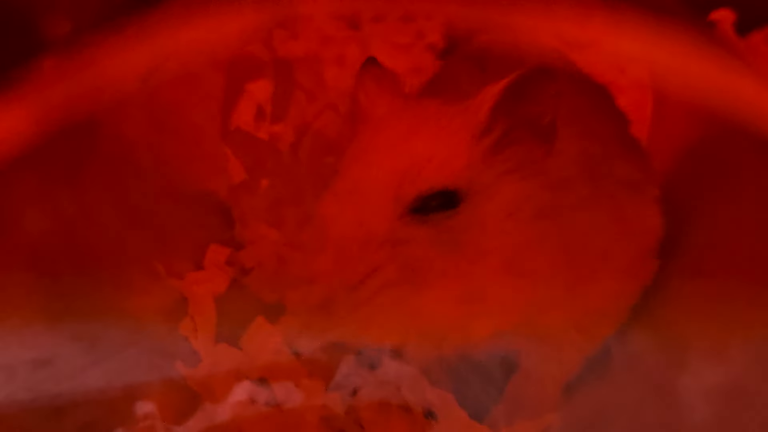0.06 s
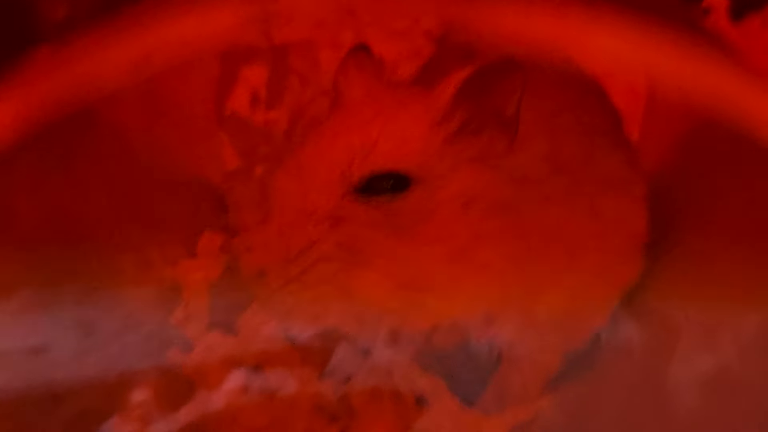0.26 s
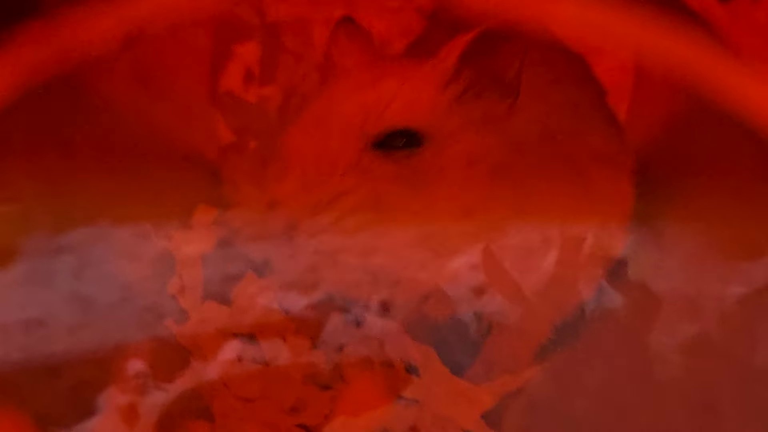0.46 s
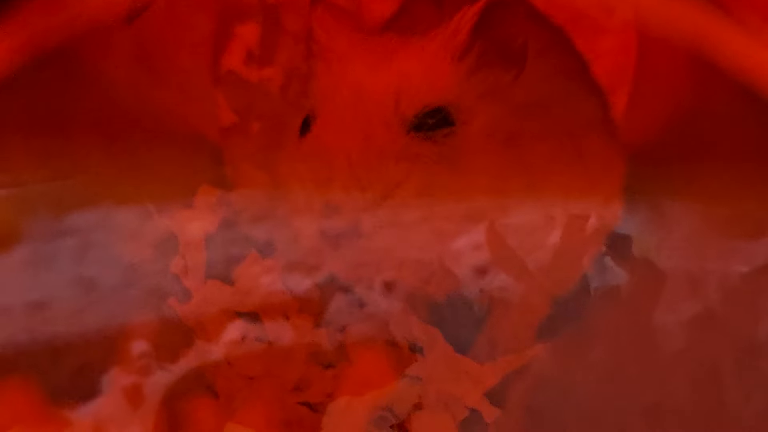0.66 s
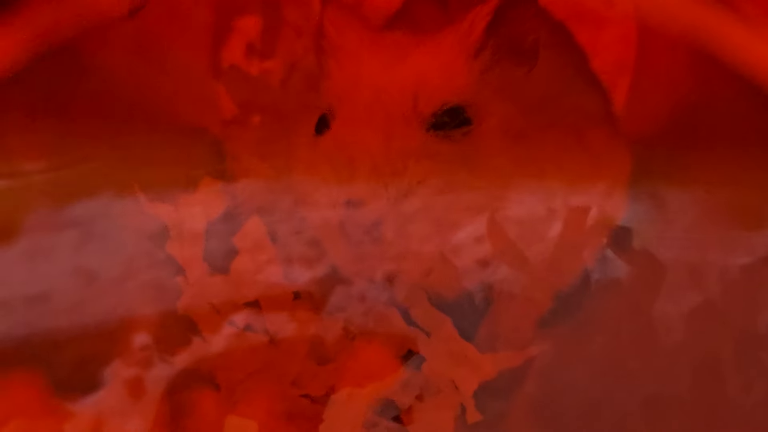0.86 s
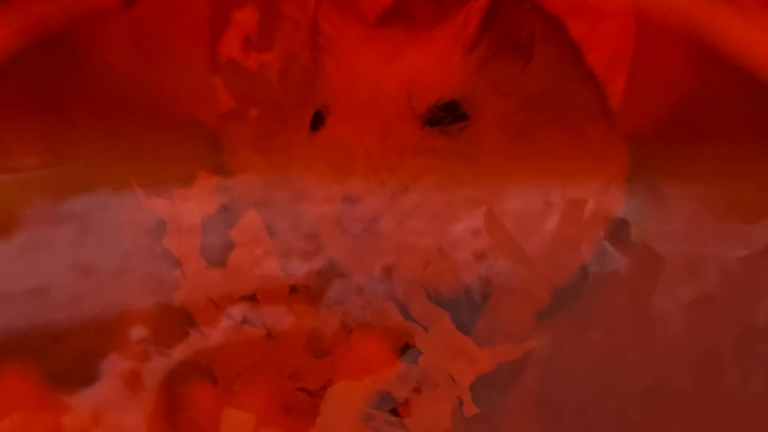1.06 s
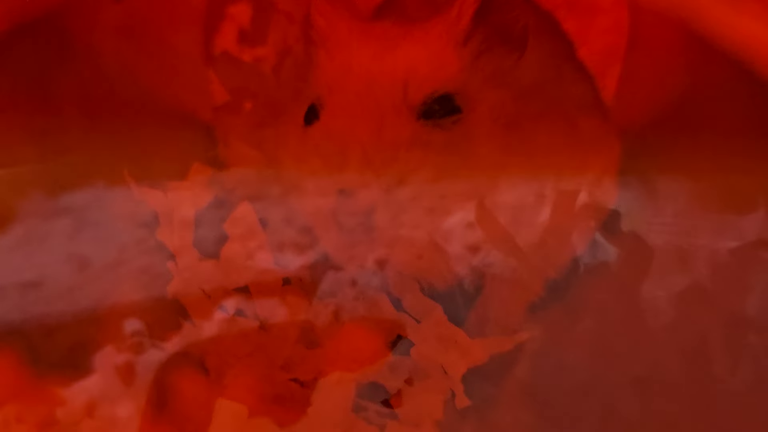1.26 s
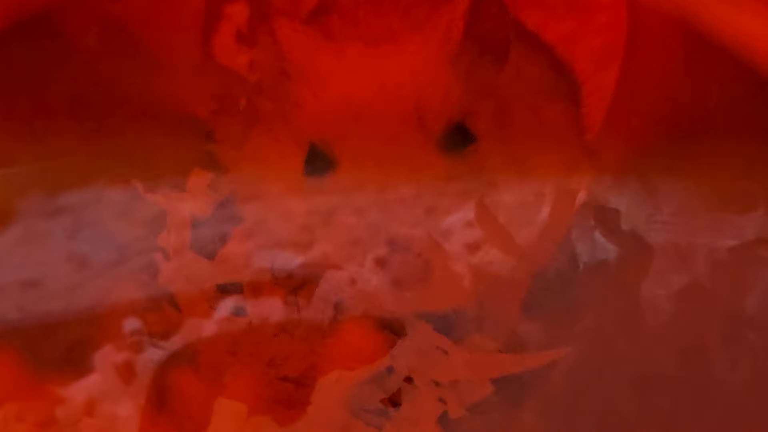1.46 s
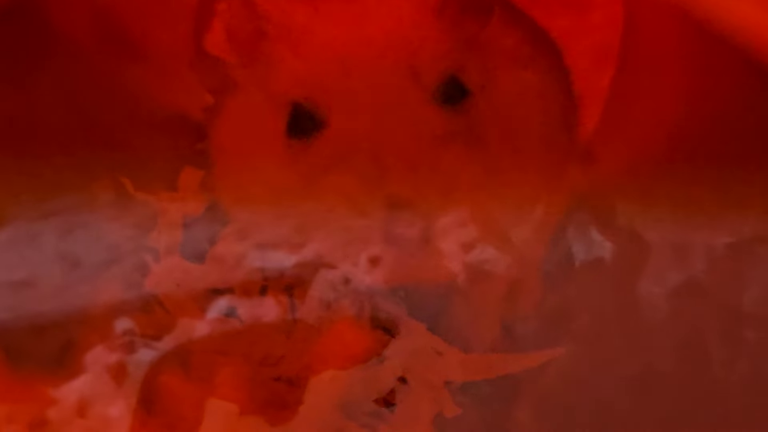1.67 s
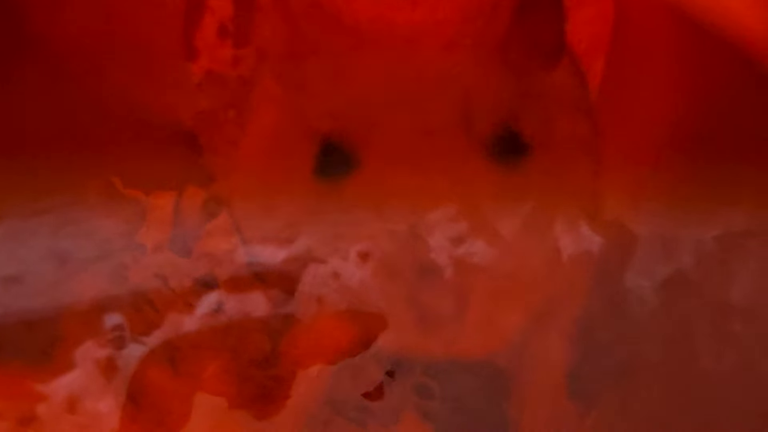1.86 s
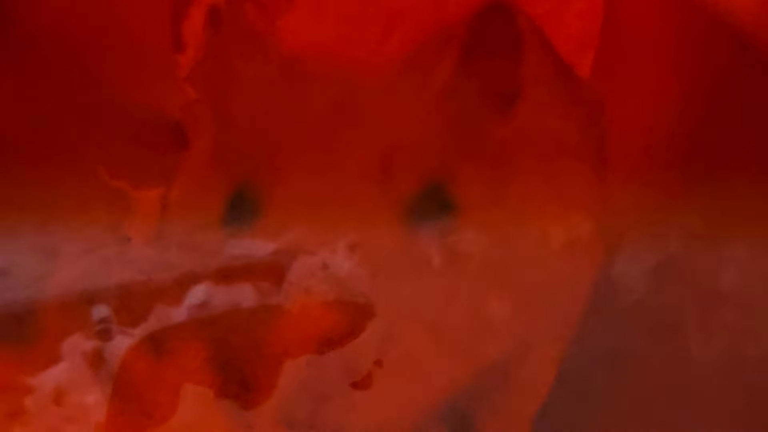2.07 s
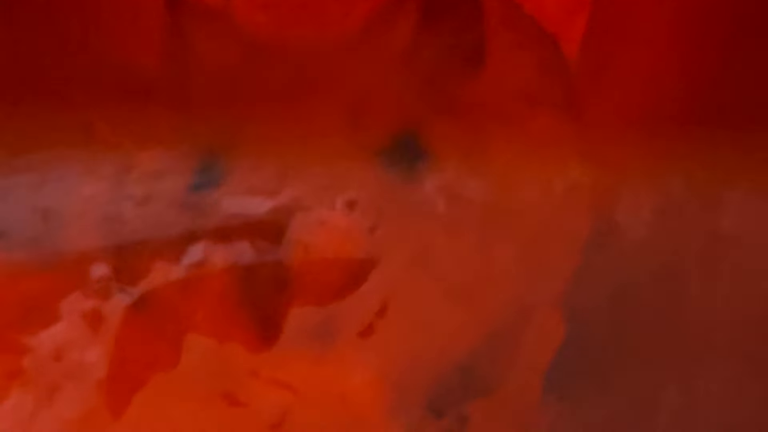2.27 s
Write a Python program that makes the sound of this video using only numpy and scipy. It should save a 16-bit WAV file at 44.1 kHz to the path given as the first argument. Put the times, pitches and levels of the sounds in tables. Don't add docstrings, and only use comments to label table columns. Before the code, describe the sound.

A small rodent rustles paper bedding and knocks a plastic hideout, with one hard early crack

```python
import sys
import numpy as np
from scipy import signal
from scipy.fft import rfft, irfft
from scipy.io import wavfile

SR = 44100
rng = np.random.default_rng(int(sys.argv[2]) if len(sys.argv) > 2 else 0)


def to_wav(s):
    ch = np.atleast_2d(s).T
    pcm = np.round(np.clip(ch, -1, 1) * 32767)
    wavfile.write(sys.argv[1], SR, pcm.astype(np.int16))


def voltage_ratio(decibels):
    exponent = np.asarray(decibels, float) / 20
    return 10 ** exponent


N = 101429

NEARER_PORT_DB = [[-9], [0]]


def rms_one(x):
    return x / np.sqrt(np.mean(x ** 2) + 1e-20)


def coloured(x, points):
    hz = np.fft.rfftfreq(N, 1 / SR) + 1
    at, db = np.transpose(points)
    gain = voltage_ratio(np.interp(np.log(hz), np.log(at), db))
    return rms_one(irfft(rfft(x) * gain, N))


def drift(rate_hz):
    r = np.exp(-2 * np.pi * rate_hz / SR)
    noise = rng.standard_normal(N + SR)
    return rms_one(signal.lfilter([1], [1, -2 * r, r * r], noise)[SR:])


def resonate(x, hz, width):
    r = np.exp(-np.pi * width / SR)
    poles = [1, -2 * r * np.cos(2 * np.pi * hz / SR), r * r]
    return signal.lfilter(np.array([1, 0, -1]) * (1 - r * r) / 2, poles, x)


def ports(x, left_db):
    lag_s = 0.0005
    late = np.interp(np.arange(N) - lag_s * SR, np.arange(N), x)
    return np.array([voltage_ratio(left_db) * late, x])


# pitch in Hz, width in Hz, level in dB.
SWAY_TONES = [(53.6, 19.8, -55), (91.5, 17, -71.5), (115, 81, -75.5), (523, 98.6, -75.5)]
SWAY_LEFT_DB = -4


def sway():
    out = 0
    for hz, width, db in SWAY_TONES:
        x = rng.standard_normal((2, N + SR // 2))
        for _ in range(2):
            x = resonate(x, hz, width)
        x = rms_one(x[:, SR // 2:]) * voltage_ratio(db)
        shared, own = x
        out = out + ports(shared, SWAY_LEFT_DB) + own * voltage_ratio(-18) * [[1], [-1]]
    return out


# pitch in Hz, level in dB per Hz.
HISS_COLOUR = [(15, -22.5), (30, -1.5), (150, 3.5), (400, -10.5), (1200, -17), (7500, -27.5), (8100, -47),
               (11500, -28), (15500, -29.5)]


def hiss():
    right_db, left_minus_right_db = -64, -6
    noise = coloured(rng.standard_normal((2, N)), HISS_COLOUR)
    return noise * voltage_ratio([[right_db + left_minus_right_db], [right_db]])


# start in seconds, length in seconds.
STROKE_TIMES = [(0, .024), (.054, .05), (.194, .05), (.305, .04), (.238, .008), (.704, .042), (1.408, .055),
                (1.503, .05), (1.615, .09), (1.43, .035), (1.9, .05), (1.908, .006), (1.99, .01),
                (2.078, .012), (2.113, .012), (2.165, .045), (2.25, .021), (2.18, .005), (2.193, .006),
                (1.805, .008), (1.775, .012), (2.285, .015), (0, .46), (1.33, 1), (.55, .14)]
# level in dB, dull part against the bright part in dB.
STROKE_LEVELS = [(-62, 0), (-64, -3), (-61, -5.5), (-68.5, -3.5), (-57.5, 10), (-68, -5.5), (-65, -3.5),
                 (-69, -13.5), (-73.5, -13), (-75, 4.5), (-73, 2.5), (-65.5, -1), (-72, 0), (-65.5, -4.5),
                 (-68.5, -2.5), (-69, -1), (-58.5, -6.5), (-69, -5), (-63, -9), (-65.5, -5.5), (-72.5, -1),
                 (-67, -4), (-70.5, -3.5), (-75, -6.5), (-74.5, -3)]
# pitch in Hz, level in dB per Hz.
BRIGHT_PAPER = [(6000, -20.5), (8200, -12.5), (9500, -8), (11600, -3), (13000, -5), (15500, -4.5)]
# pitch in Hz, level in dB per Hz.
DULL_PAPER = [(400, -6), (900, 3), (1800, 2.5), (3000, 0), (5000, 0), (7500, -10.5), (9500, -37)]


def flicker():
    return voltage_ratio(2 * drift(40))


def paper():
    t = np.arange(N) / SR
    bright_power, dull_power = 0, 0
    for (s, length), (db, dull_db) in zip(STROKE_TIMES, STROKE_LEVELS):
        edge = 0.0042 + 0.1 * length
        rise_or_fall = np.minimum(t - s + edge, s + length + edge - t) / (2 * edge)
        stroke = np.clip(rise_or_fall, 0, 1) ** 2
        bright_power = bright_power + stroke * voltage_ratio(2 * db)
        dull_power = dull_power + stroke * voltage_ratio(2 * (db + dull_db))

    grains_per_s, alike = 12000, 0.12
    hits = rng.random((3, N)) < grains_per_s / SR
    grains = hits * rng.standard_normal((3, N)) * voltage_ratio(1.2 * drift(50))
    grains = np.sqrt(alike) * ports(grains[0], 0) + np.sqrt(1 - alike) * grains[1:]

    bright = coloured(grains, BRIGHT_PAPER)
    split = signal.butter(2, 10500, fs=SR, output="sos")
    lower = signal.sosfiltfilt(split, bright)
    bright = lower * flicker() + (bright - lower) * flicker()
    dull = coloured(grains, DULL_PAPER) * flicker()
    return (np.sqrt(bright_power) * bright + np.sqrt(dull_power) * dull) * voltage_ratio(NEARER_PORT_DB)


def knocks(rows, body, recoil_ms, recoil_share):
    pivot_hz = 225
    out, pulses = np.zeros((2, N)), []
    for s, db, ms, weight_db, way in rows:
        start = int((s - recoil_ms / 1000) * SR)
        since_ms = (np.arange(start, start + SR // 40) / SR - s) * 1000
        age = np.maximum(since_ms + [[0], [recoil_ms]], 0) / ms
        main, recoil = age * np.exp(-age) * 1000 / (ms * SR)
        pulses.append((start, way * (main - recoil_share * recoil)))
    for hz, mode_db, t60, left_db in body:
        octaves_down = max(np.log2(pivot_hz / hz), 0)
        force = np.full(N + SR, 1e-18)
        for (start, pulse), (s, db, ms, weight_db, way) in zip(pulses, rows):
            force[start:start + len(pulse)] += pulse * voltage_ratio(db + mode_db + weight_db * octaves_down)
        r = voltage_ratio(-60 / (t60 * SR))
        w = 2 * np.pi * hz / SR
        ring = signal.lfilter([0, np.sin(w)], [1, -2 * r * np.cos(w), r * r], force[:N])
        out += ports(ring, left_db)
    return out


# pitch in Hz, level in dB, time to fade by 60 dB in seconds, left minus right in dB.
SHELL_MODES = [(56.2, -10, 0.15, -6.5), (105.7, -1.5, 0.084, -12), (150, -6.5, 0.07, -16.5),
               (227.6, 0, 0.059, -14), (290, -20, 0.037, -13.5), (384, -8, 0.034, -19.5),
               (468, -11, 0.034, -7), (562.4, -11.5, 0.071, -10), (624, -10, 0.044, -8),
               (758, -16.5, 0.037, -10.5), (848, -9.5, 0.063, -9.5), (1160, -18, 0.041, -8),
               (1410, -17.5, 0.07, -5.5)]
# start in seconds, level in dB, contact in ms, low weight in dB per octave down, direction and size of push.
SHELL_TAPS = [(.012, -32, 0.34, -8, 0.84), (.058, -34.5, 0.29, -26, 0.72), (.0855, -34.5, 0.79, 6, -1),
              (.143, -47, 0.44, 7, 0.76), (.2468, -3, 0.34, 4.5, 0.88), (.2495, -17, 0.55, -2, -0.31),
              (.2540, -10, 0.6, -2, 0.096), (.3212, -18.5, 0.48, -17, 0.61), (.3275, -9.5, 1.18, -14, 0.77),
              (.350, -37, 0.28, 3, 0.39), (.368, -41, 0.19, 12, -0.81), (.511, -37.5, 0.88, 10, -1.26),
              (.693, -36.5, 0.82, 6.5, -1.25), (.714, -34, 1.23, 4, -0.42), (.750, -45, 1, 9, 0.8),
              (1.051, -45.5, 0.95, 9.5, 0.74), (.2715, -21, 0.73, -2, 0.86), (.4, -42, 1.05, 6.5, 0.69),
              (.43, -43.5, 1.4, 7.5, 1), (.595, -46, 0.75, 8, 0.23)]
# start in seconds, level in dB, contact in ms, low weight in dB per octave down, direction and size of push.
SHELL_PUSHES = [(0.022, -31, 0.68, -1.5, 0.77), (.031, -46, 1.4, 12, -0.54), (0.064, -33, 2.2, -2, -1.2),
                (0.191, -32.5, 1.25, 6, 0.88), (0.234, -29, 1.57, 13.5, 0.62),
                (0.371, -7, 2.26, -11.5, 0.35), (.518, -29, 1.3, 4, 0.98), (0.659, -37, 3.8, 6.5, 1),
                (0.852, -43.5, 2.7, 5, 0.66), (0.937, -32.5, 2.9, 10.5, 0.99), (0.969, -38, 1.64, 8, 0.91),
                (1.077, -46, 3.7, 8, 1), (1.152, -39, 1.85, 1.5, 0.9), (1.968, -34, 1.9, 3, 1),
                (.003, -36.5, 3, 13, -0.69), (2.151, -41.5, 2, 5, 0.95), (2.255, -45, 3, 8, 0.48)]


def shell():
    return knocks(SHELL_TAPS + SHELL_PUSHES, SHELL_MODES, recoil_ms=2.007, recoil_share=0.26)


# start in seconds, level in dB, centre in Hz,
# left minus right in dB.
TICKS = [(0.0564, -44, 1150, 7), (.0575, -50, 3600, 1), (0.083, -47, 930, 3), (0.319, -52, 3360, -17),
         (.330, -54, 4600, 3), (0.3667, -45, 810, -15), (0.367, -51, 1370, -7), (.692, -48, 920, -15),
         (2.116, -60, 1700, -10), (2.253, -58, 1400, 2), (0.2451, -30.5, 1160, -8.5),
         (0.251, -29, 1160, -6.5), (.512, -50, 690, -6), (1.9465, -53, 1780, -8.5),
         (2.190, -52, 1810, -12)]


def ticks():
    out = np.zeros((2, N))
    for s, db, hz, left_db in TICKS:
        click = np.full(N, 1e-18)
        click[int(s * SR)] = -voltage_ratio(db + 4.5) * SR / (hz * 2)
        for centre, part_db in (hz, 0), (hz * 1.5, -15):
            width = centre * 0.22 * 1.2
            ring = resonate(resonate(click, centre, width), centre, width)
            out += ports(voltage_ratio(part_db) * ring, left_db)
    return out


# start in seconds, level in dB.
SNAPS = [
    (0.2453, -26),
    (0.2482, -31.5),
    (0.2514, -26),
    (0.252, -31.5),
    (0.2563, -35.5),
]
# pitch in Hz, level in dB per Hz.
SNAP_COLOUR = [(530, -41), (900, -1), (2690, -20.5), (3000, 1.5), (4660, -36.5), (6350, -16.5), (7410, -18),
               (13400, -17.5), (15500, -13.5)]
# pitch in Hz, width in Hz, level in dB.
PLASTIC_RINGS = [(620, 90, 1.5), (860, 320, -3), (1180, 84, -3), (1536, 90, -17.5), (2270, 210, -16),
                 (3036, 210, -11), (4690, 310, -11.5), (5700, 490, -23)]
# pitch in Hz, level in dB per Hz.
TAIL_COLOUR = [(500, 23), (1100, 12), (1800, 3.5), (3000, 1), (5000, -7), (7500, -8.5), (9500, -17),
               (13000, -13.5)]


def crack():
    snap_t60_s, tail_t60_s, tail_db = 0.012, 0.14, -20
    t = np.arange(N) / SR
    snap, tail = 1e-18, 0
    for s, db in SNAPS:
        age = np.maximum(t - s, 0)
        snap = snap + (t >= s) * voltage_ratio(db - 60 * age / snap_t60_s)
        tail = tail + (t >= s) * voltage_ratio(db + tail_db - 60 * age / tail_t60_s)
    burst = snap * rng.standard_normal(N)
    rings = np.zeros(N)
    for k, (hz, width, db) in enumerate(PLASTIC_RINGS):
        rings += voltage_ratio(db) * resonate(burst, hz, width) * (-1) ** k
    rings *= voltage_ratio(2) * np.std(burst) / np.std(rings)
    broad = snap * coloured(rng.standard_normal(N), [(300, -20.0)] + list(SNAP_COLOUR))
    dying = tail * coloured(rng.standard_normal((2, N)), TAIL_COLOUR) * voltage_ratio([[-6], [0]])
    return ports(broad + rings, -9) + dying


# centre in seconds, half length in seconds, level in dB.
FUR_STROKES = [
    (0.406, 0.045, -69),
    (1.527, 0.02, -74),
    (1.667, 0.054, -69),
    (1.79, 0.035, -72),
]
# pitch in Hz, level in dB per Hz.
FUR_COLOUR = [(8000, -24), (11000, -7), (12000, -1.5), (13500, -10), (15500, -10.5)]


def fur():
    t = np.arange(N) / SR
    swell = np.zeros(N)
    for s, half, db in FUR_STROKES:
        swell += voltage_ratio(db) * np.cos(np.pi / 2 * np.clip((t - s) / half, -1, 1))
    return swell * coloured(rng.standard_normal((2, N)), FUR_COLOUR) * voltage_ratio(NEARER_PORT_DB)


def swing():
    start_s, length_s, hz, db = 1.302, 0.15, 59.4, -37
    age = np.arange(N) / SR - start_s
    swell = np.sin(np.pi * np.clip(age / length_s, 0, 1)) ** 1.7
    return ports(voltage_ratio(db) * swell * np.sin(2 * np.pi * hz * age + 2.3), SWAY_LEFT_DB)


# pitch in Hz, level in dB, time to fade by 60 dB in seconds, left minus right in dB.
WALL_MODES = [(97.4, -19, 0.11, -11.5), (188.5, -9, 0.084, -14.5), (232, -1.5, 0.052, -13),
              (312, -9.5, 0.034, -10), (440, -3.5, 0.0222, -16), (557, -10, 0.025, -13.5),
              (650, -16.5, 0.03, -3.5), (820, -11, 0.022, -13.5), (940, -12, .02, -9),
              (1097, -16, 0.031, -11), (1444, -13, 0.037, -5), (1800, -10, 0.013, -12)]
# start in seconds, level in dB, contact in ms, low weight in dB per octave down, direction and size of push.
PAW_TAPS = [
    (1.9460, -23, 0.24, -9, 0.65),
    (1.9535, -32.5, 0.34, -3, -0.44),
    (2.0180, -35.5, 0.24, -9, 0.79),
    (2.0275, -30, 0.81, 6.5, 0.64),
    (2.1815, -40, 0.16, 3, -0.66),
    (2.1893, -25.5, 0.24, -3, 0.76),
    (2.1985, -35, 0.23, 0, 0.54),
    (2.2312, -29, 0.27, 3, 0.86),
    (2.2588, -31.5, 0.28, -3, 0.7),
    (2.2685, -26.5, 1, 0.5, 0.85),
]


def wall():
    return knocks(PAW_TAPS, WALL_MODES, recoil_ms=1.94, recoil_share=0.33)


def squeak():
    start_s, length_s, hz, width_hz, db = 2.253, 0.021, 11470, 200, -62.5
    age = np.arange(N) / SR - start_s
    swell = np.sin(np.pi * np.clip(age / length_s, 0, 1)) ** 0.6
    tone = resonate(resonate(rng.standard_normal(N), hz, width_hz), hz, width_hz)
    return ports(voltage_ratio(db) * swell * rms_one(tone), -9)


def scene():
    return sway() + paper() + shell() + ticks() + crack() + fur() + swing() + wall() + squeak()


def band_limit(x):
    return signal.sosfilt(signal.butter(12, 16620, fs=SR, output="sos"), x)


def record(dry):
    bass_cut = signal.butter(4, 53.3, "high", fs=SR, output="sos")
    top_cut = signal.cheby2(14, 50, 16200, fs=SR, output="sos")
    x = signal.sosfilt(bass_cut, dry) + hiss()
    x = signal.sosfilt(top_cut, x)
    return band_limit(np.clip(x, -1, 1))


dry = scene()
out = record(dry)
to_wav(out)
```